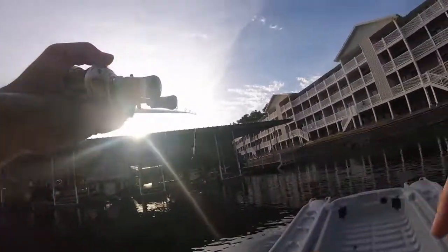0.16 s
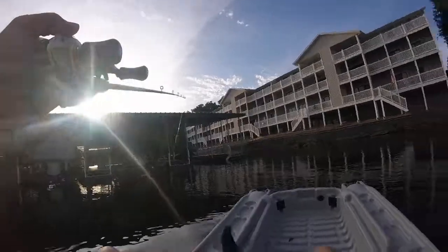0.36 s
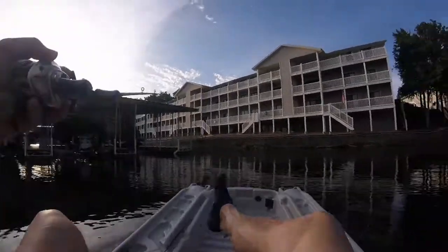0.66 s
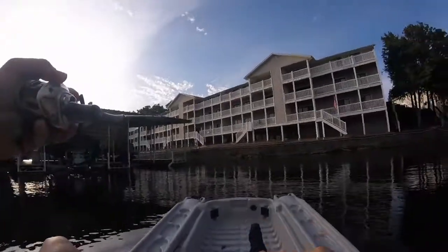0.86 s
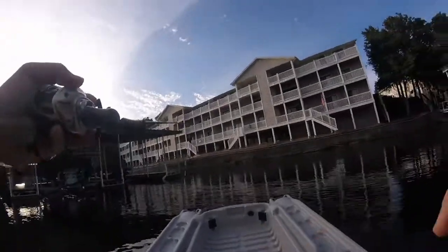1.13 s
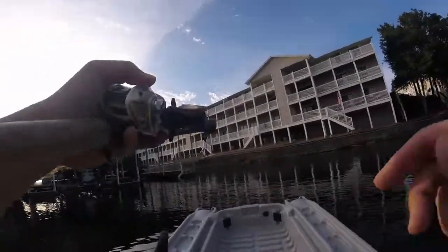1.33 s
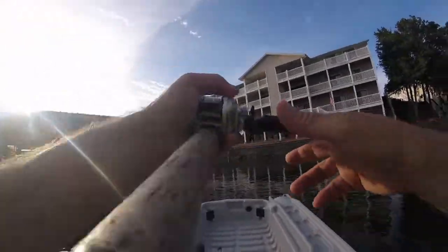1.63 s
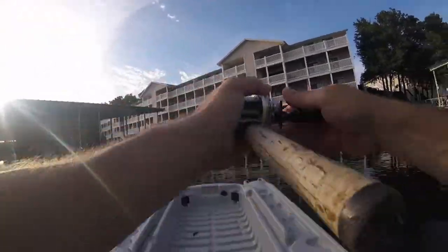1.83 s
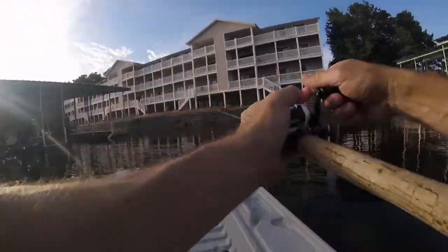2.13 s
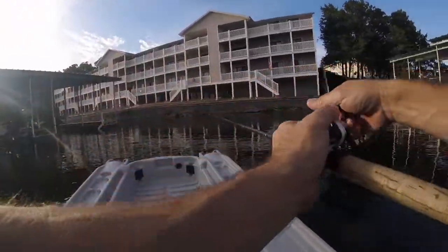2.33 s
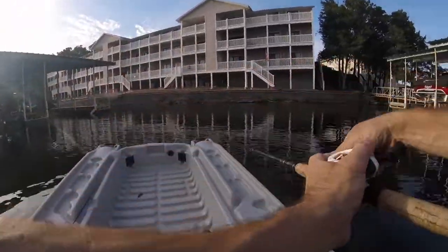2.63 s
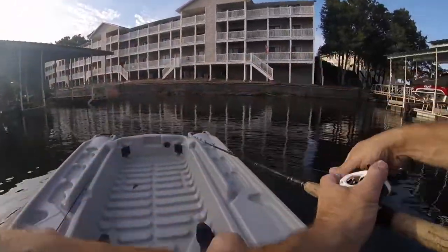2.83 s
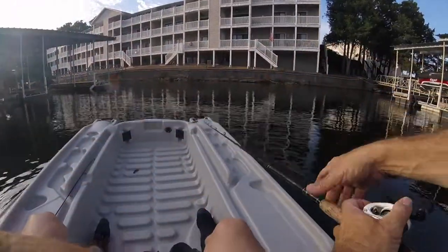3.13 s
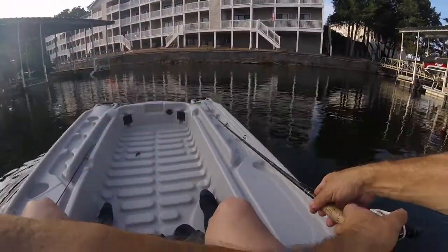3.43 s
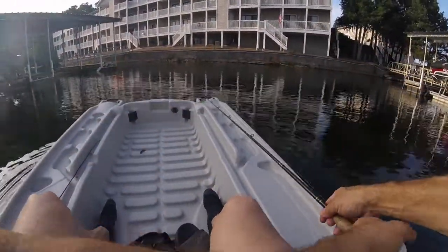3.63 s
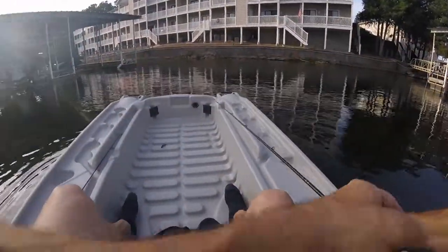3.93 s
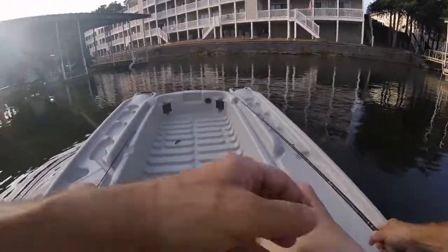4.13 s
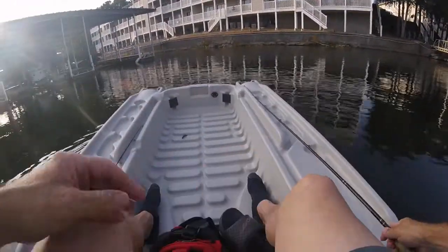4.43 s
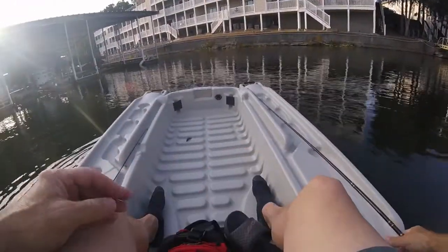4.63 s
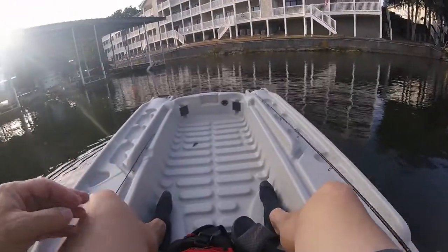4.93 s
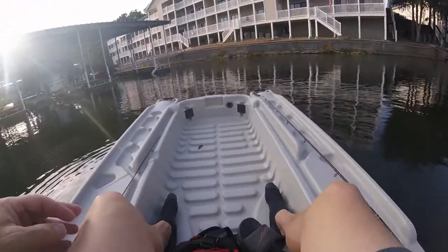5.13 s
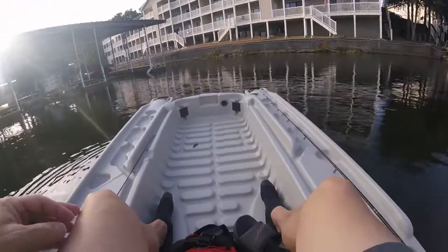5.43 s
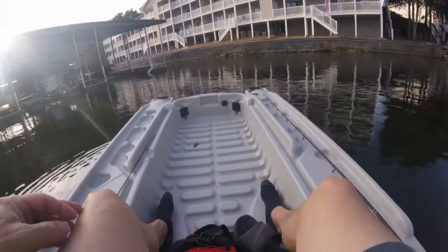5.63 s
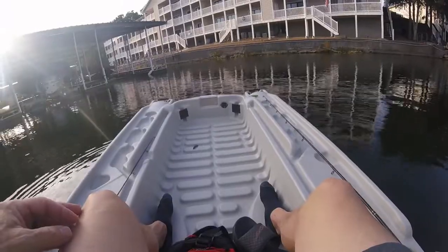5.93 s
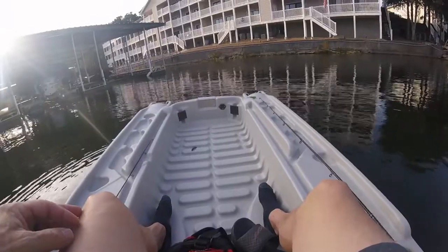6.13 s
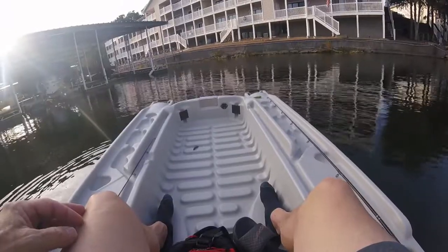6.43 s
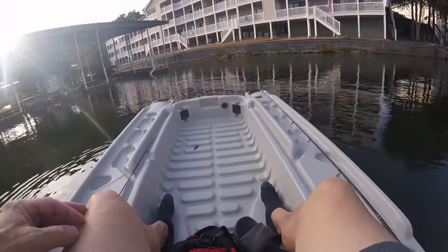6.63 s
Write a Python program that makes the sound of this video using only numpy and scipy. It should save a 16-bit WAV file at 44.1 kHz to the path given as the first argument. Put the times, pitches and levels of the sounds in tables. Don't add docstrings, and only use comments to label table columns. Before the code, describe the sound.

A microphone worn near the hands picks up crisp reel clicks, soft grip creaks and rubbing, then harder knocks as a fishing rod meets the plastic side of a small boat. It drops with a boomy thud and rattles still. Outdoors, quiet low rumble, faint airy hiss, a thin motor buzz and a slowly falling engine hum continue throughout.

```python
import sys
import numpy as np
from scipy import signal
from scipy.fft import rfft, irfft
from scipy.io import wavfile
from scipy.ndimage import uniform_filter1d

SR = 44100
rng = np.random.default_rng(int(sys.argv[2]) if len(sys.argv) > 2 else 0)


def persist_wave(psi):
    counts = np.round(np.clip(psi, -1, 1) * 32767).astype(np.int16)
    wavfile.write(sys.argv[1], SR, np.atleast_2d(counts).T)


def level_to_linear(level):
    exponent = np.asarray(level, float) / 20
    return 10 ** exponent


N = 298557

# f/Hz, bandwidth/Hz, level/dB
HULL_MODES = [(131, 22, 5), (157, 55, 13), (224.5, 7.9, -5.5), (362, 17.5, -7), (480, 30, -6),
              (614, 14.6, -3.5)]


def clock():
    return np.arange(N) / SR


def in_time(rows):
    s, *columns = np.transpose(rows)
    return [np.interp(clock(), s, c) for c in columns]


def rms_one(x):
    return x / np.sqrt(np.mean(x ** 2) + 1e-20)


def drift(rate_hz):
    r = np.exp(-2 * np.pi * rate_hz * 40 / SR)
    slow = signal.lfilter([1], [1, -2 * r, r * r], rng.standard_normal(N // 40 + 2002))[2000:]
    return np.interp(np.arange(N) / 40, np.arange(len(slow)), rms_one(slow))


def lowpass(x, order, hz):
    return signal.sosfilt(signal.butter(order, hz, fs=SR, output="sos"), x)


def bandpass(x, order, low_hz, high_hz):
    return signal.sosfilt(signal.butter(order, [low_hz, high_hz], "band", fs=SR, output="sos"), x)


def resonate(x, hz, width_hz):
    r = np.exp(-np.pi * max(width_hz, 5) / SR)
    poles = [1, -2 * r * np.cos(2 * np.pi * hz / SR), r * r]
    return signal.lfilter(np.array([1, 0, -1]) * (1 - r * r) / 2, poles, x)


def narrow_band(x, hz, width_hz):
    return rms_one(resonate(resonate(x, hz, width_hz), hz, width_hz))


def coloured(spectrum, patchy_db):
    white = rfft(rng.standard_normal(N))
    hz = np.arange(N // 2 + 1) * SR / N + 1e-3
    points_hz, points_db = np.transpose(spectrum)
    shaped = white * level_to_linear(np.interp(np.log(hz), np.log(points_hz), points_db))
    shaped = shaped / np.sqrt(np.mean(irfft(shaped, N) ** 2))
    out = 0
    for k in range(8, 30, 2):
        share = np.clip(1 - np.abs(2 * np.log2(hz) - k) / 2, 0, 1)
        out = out + irfft(shaped * share, N) * level_to_linear(patchy_db * drift(10.3))
    return out


def body(push, modes, widen, spread_db):
    draws = rng.standard_normal((min(len(modes), 5), 2))
    draws = np.resize(draws, (len(modes), 2))
    out = 0
    for k, ((hz, width_hz, db), (strength, detune)) in enumerate(zip(modes, draws)):
        gain = (-1) ** k * level_to_linear(db + spread_db * strength) * np.sqrt(1 / width_hz)
        out = out + gain * resonate(push, hz * (1 + detune / 60), width_hz * widen)
    return out / np.max(np.abs(out))


def rattle(t60, grain_db, size, rise_s=.0001):
    t = np.arange(size) / SR
    grains = rng.standard_normal(size) * level_to_linear(grain_db * np.minimum(rng.exponential(1, size), 3))
    fall_db = -60 * t / np.clip(t60, .003, .045)
    crack = 1 + np.exp(-t / .001)
    tail = level_to_linear(-26 + .25 * fall_db)
    return grains * (1 - np.exp(-t / rise_s)) * (crack * level_to_linear(fall_db) + tail)


def add(out, s, piece):
    i = max(round(s * SR), 0)
    out[i:i + len(piece)] += piece[:N - i]


def air():
    # t/s, level/dB
    swell = [(0.0, -37.5), (0.68, -37), (0.92, -39), (2.49, -39), (5.28, -37.5), (5.77, -41), (6.77, -38.5)]
    # f/Hz, density/dB
    rumble_spectrum = [(12, -27), (20, -16), (54, -4), (103, -2), (163, -5), (278, -11.5), (430, -16.5),
                       (1100, -33.5), (1430, -75)]
    # f/Hz, density/dB
    hiss_spectrum = [(530, -40), (900, -7), (1580, -3), (2440, -4.5), (4340, -9.5), (6560, -8.5),
                     (9370, -14.5), (10400, -18.5), (12300, -17), (14000, -29)]
    rumble_db, = in_time(swell)
    hiss_db = -59.5 - .5 * clock() + 0.9 * (rumble_db - rumble_db.mean())
    throbs = level_to_linear(-49) * narrow_band(rng.standard_normal(N), 61.5, 5)
    throbs += level_to_linear(-57) * narrow_band(rng.standard_normal(N), 121, 6)
    insects = level_to_linear(-71 + 1.5 * drift(1.5)) * narrow_band(rng.standard_normal(N), 6500, 330)
    rumble = level_to_linear(rumble_db - 6.5) * coloured(rumble_spectrum, patchy_db=1.16)
    hiss = level_to_linear(hiss_db + 0.6) * coloured(hiss_spectrum, patchy_db=1.64)
    return rumble + hiss + throbs + insects


def hums():
    # f/Hz, rms level/dB, start t/s, end t/s
    machines = [
        (105, -48.5, -.3, .9),
        (73.4, -53, 1.2, 4.1),
        (349.6, -63.5, 1.87, 5.9),
    ]
    out = np.zeros(N)
    for hz, db, a, b in machines:
        gate = np.interp(clock(), [a - .2, a + .1, b - .1, b + .2], [0, 1, 1, 0])
        level = np.sqrt(2) * level_to_linear(db + 2.0 * drift(2)) * gate
        turns = np.cumsum(hz * (1 + 0.00814 * drift(1.574))) / SR
        out += level * np.sin(2 * np.pi * turns)
    return out


def spray():
    # f/Hz, bandwidth/Hz, rms level/dB, start t/s, end t/s
    bands = [
        (2290, 310, -68, 0.34, 1.87),
        (4800, 960, -69, -.3, 1.9),
        (6490, 470, -66.5, 0.34, 1.8),
    ]
    out = np.zeros(N)
    for hz, width_hz, db, a, b in bands:
        gate = np.interp(clock(), [a - .3, a + .1, b - .2, b + .2], [0, 1, 1, 0])
        level = level_to_linear(db + 1.5 * drift(3)) * gate
        out += level * narrow_band(rng.standard_normal(N), hz, width_hz)
    return out


def motor():
    # f/Hz, bandwidth/Hz, rms level/dB, lag t/ms
    casing = [(2090, 25, -73, 0), (2620, 200, -72, 1), (2950, 300, -71.5, 1), (3620, 350, -70, .3),
              (4500, 400, -75, 1.2), (5080, 250, -74, 1.5), (5690, 230, -69.5, 1.6), (6390, 300, -79, 1)]
    # t/s, level/dB
    carry = [(0, -9), (.7, 1), (2.4, 3), (3.8, 3), (4.4, -1), (5.3, -2), (5.8, 2), (6.77, 1)]
    turn_hz = 58.09
    high_db, = in_time(carry)
    before = np.clip(2 * (2.6 - clock()), 0, 1)
    low_db = high_db - 3.5 - 7 * before
    mid_db = high_db - 12 * (1 - before)
    starts = np.arange(int(N / SR * turn_hz) - 1) / turn_hz
    strengths = level_to_linear(1.6 * rng.standard_normal(len(starts)))
    out = np.zeros(N)
    for hz, width_hz, db, lag_ms in casing:
        pulses = np.zeros(N)
        pulses[np.round((starts + lag_ms / 1000) * SR).astype(int)] = strengths
        pulses += level_to_linear(-9) * np.roll(pulses, round(SR / turn_hz / 2))
        carry_db = low_db if hz < 4000 else mid_db if hz < 5400 else high_db
        out += level_to_linear(db + 2 + carry_db + drift(2)) * narrow_band(pulses, hz, 1.04 * width_hz)
    return out


def engine():
    # t/s, f/Hz
    shaft = [(0, 29.75), (.6, 29.58), (1.2, 28.27), (2, 27.32), (2.6, 26.46), (4, 25.93), (4.6, 25.28),
             (6.1, 24.72)]
    orders = (5, 6, 8)
    orders_db = (-47.5, -46, -45)
    # t/s, depth/dB, half length t/s
    minima = [
        [(3.0, 20, 0.97), (5.5, 40, 0.48)],
        [(1.2, 8, 0.38), (4.5, 28, .4), (6.6, 13, 0.69)],
        [(0.197, 26.5, 2)],
    ]
    shaft_hz, = in_time(shaft)
    turns = np.cumsum(shaft_hz * (1 + 0.0018 * drift(2.4))) / SR
    out = np.zeros(N)
    for order, db, fades in zip(orders, orders_db, minima):
        level_db = db + drift(3.2)
        for s, depth_db, half_s in fades:
            level_db = level_db - depth_db * np.exp(-((clock() - s) / half_s) ** 2)
        out += np.sqrt(2) * level_to_linear(level_db) * np.sin(2 * np.pi * order * turns)
    return out


def load():
    # t/s, rise t/s, hold t/s, level/dB, decay/(dB/s)
    landings = [
        (0.416, 0.1, .01, -35, 122),
        (1.323, 0.031, .01, -38.5, 200),
        (4.303, 0.095, 0.12, -35, 498),
        (5.052, .006, .001, -9, 227),
        (5.098, 0.024, .01, -21, 100),
        (6.237, 0.0047, 0.11, -28.5, 430),
    ]
    t, envelopes = clock(), []
    for s, rise_s, hold_s, db, fall in landings:
        rise = np.clip((t - s) / rise_s, 0, 1) ** 2
        envelopes.append(rise * level_to_linear(db - fall * np.maximum(t - s - rise_s - hold_s, 0)))
    return np.max(envelopes, axis=0)


def boom():
    bumps = rng.standard_normal(N) * level_to_linear(3 * drift(40))
    bumps = lowpass(bumps, 2, 450)
    modes = [(50, 30, -23), (94, 14, -7)] + HULL_MODES[:3] + [(252, 29, 0.76)]
    low = sum(level_to_linear(db) * resonate(bumps, hz, 1.5 * width_hz) for hz, width_hz, db in modes)
    return level_to_linear(-4) * load() * rms_one(low)


def strokes():
    # t/s, length t/s, bright level/dB, dull level/dB
    slides = [(0.381, 0.097, -50, -41.5), (0.492, 0.07, -44, -45.5), (0.596, 0.095, -55, -56),
              (1.224, 0.23, -70, -59), (1.32, 0.1, -69, -47), (1.387, 0.27, -84, -58.5),
              (2.858, 0.19, -57, -50), (3.035, 0.097, -61, -61), (3.177, 0.36, -60, -55.5),
              (3.964, 0.12, -55, -46), (4.08, 0.23, -62, -56), (4.259, 0.17, -64, -42.5),
              (4.364, 0.17, -45, -44.5), (4.537, 0.15, -54, -57.5), (4.977, 0.056, -58, -40),
              (5.008, .06, -44, -47), (5.09, .09, -47, -45), (5.172, .12, -60, -46),
              (5.429, 0.028, -56, -39.5), (5.473, .1, -55.5, -49), (6.197, 0.37, -60, -62)]
    power, t = np.zeros((2, N)), clock()
    ends, peak_share, release_s = level_to_linear(-6), 0.34, 0.023
    for s, length, bright_db, dull_db in slides:
        corners = [-.006, 0, peak_share * length, length, length + release_s]
        shape = np.interp(t - s, corners, [0, ends, 1, ends, 0])
        power += (level_to_linear(np.array([[bright_db], [dull_db]])) * shape) ** 2
    return np.sqrt(power)


def rubbing():
    # f/Hz, density/dB
    rub_spectrum = [(590, -21), (1550, -2), (2030, -2), (4070, -8), (5330, -6), (6430, -11), (8000, -46),
                    (12000, -60)]
    bright, dull = strokes()
    clumps = level_to_linear(2.5 * drift(90))
    modes = HULL_MODES[3:] + [(750, 135, -13.0), (1190, 670, -20.5)]
    through_hull = sum(level_to_linear(db) * resonate(rng.standard_normal(N), hz, 3.1 * width_hz)
                       for hz, width_hz, db in modes)
    through_hull = lowpass(through_hull, 2, 1700)
    airborne = coloured(rub_spectrum, patchy_db=-2.5)
    return clumps * (level_to_linear(-0.5) * bright * airborne + level_to_linear(2.0) * dull * rms_one(through_hull))


def creaks():
    # f/Hz, bandwidth/Hz, level/dB
    blank = [(760, 55, -4), (1100, 70, -10), (1350, 120, -15), (1580, 70, 2), (2120, 83, -2),
             (2650, 99, -36)]
    jerks_per_s = 490
    strengths = level_to_linear(4.5 * np.minimum(rng.exponential(1, N), 3)) * rng.choice([-1, 1], N)
    jerks = (rng.random(N) < jerks_per_s / SR) * strengths
    rung = 0
    for hz, width_hz, db in blank:
        share = level_to_linear(4.5 * rng.standard_normal(N))
        rung = rung + level_to_linear(db) * resonate(jerks * share + 1e-18, hz, width_hz)
    return level_to_linear(-1) * strokes()[0] * rms_one(lowpass(rung, 3, 2800))


def snaps():
    # t/s, peak level/dB
    edges = [(0.3865, -50), (0.423, -35), (0.4958, -25), (0.587, -51.5), (0.6285, -45), (2.833, -52),
             (2.9297, -53), (3.2869, -67), (3.9355, -35), (4.0532, -68), (4.275, -43.5), (4.3071, -25),
             (4.3745, -58), (4.3984, -53), (4.4332, -31), (4.9821, -37), (5.0669, -46), (5.0948, -47),
             (5.3617, -46), (5.4321, -47), (6.304, -35)]
    out, t = np.zeros(N), np.arange(2000) / SR
    t60 = 0.015
    for s, db in edges:
        add(out, s, level_to_linear(db - 5.5 - 60 * t / t60) * rng.standard_normal(len(t)))
    return bandpass(out, 3, 8000, 12500)


def chatter():
    # t/s, length t/s, level/dB, centre f/Hz
    stretches = [(0.395, 0.065, -49, 2800), (0.398, 0.07, -46, 810), (0.496, 0.037, -52, 3200),
                 (0.502, 0.076, -50, 905), (1.233, .2, -55, 990), (1.908, 0.028, -57, 1200),
                 (1.934, 0.022, -45, 905), (1.976, 0.023, -51.5, 1390), (2.048, 0.021, -52.5, 1500),
                 (2.834, .2, -64, 1300), (2.976, .008, -47, 4470), (3.03, 0.17, -59, 1280),
                 (3.96, .1, -52.5, 1400), (4.072, 0.13, -55, 1290), (4.972, 0.01, -43.5, 2940),
                 (5.008, 0.021, -51.5, 4800), (5.083, 0.055, -59, 4160), (5.242, 0.039, -59, 2000),
                 (6.217, 0.057, -49, 684)]
    out, t = np.zeros(N), np.arange(6000) / SR
    span, fade_db = 1.7, 6
    for s, length, db, hz in stretches:
        grains = rng.standard_normal(len(t)) * level_to_linear(4.0 * np.minimum(rng.exponential(1, len(t)), 3))
        band = rms_one(bandpass(grains, 2, hz / span, hz * span))
        gate = np.interp(t, [0, .002, length, length + .01], [0, 1, 1, 0])
        add(out, s, band * level_to_linear(db - fade_db * t / length) * gate)
    return out


def rings():
    # t/s, f/Hz, peak level/dB, t60/s
    ringing = [(.058, 900, -46, 0.026), (.248, 1030, -48, 0.036), (.349, 890, -44, .04),
               (.364, 1150, -44, 0.027), (1.345, 790, -40.5, 0.23), (1.362, 42.3, -30, .25),
               (1.379, 1410, -38, 0.032), (1.98, 45.3, -38, .25), (2.783, 1460, -32.5, 0.042),
               (3.04, 1550, -47, 0.082), (3.068, 1190, -46, 0.1), (3.075, 1580, -42, .05),
               (3.134, 1550, -47, .04), (3.381, 1570, -54, .05), (3.43, 1520, -41, 0.046),
               (3.482, 1430, -45, 0.045), (3.7, 853, -54, 0.036), (3.936, 620, -27.5, 0.062),
               (3.996, 760, -35, .06), (4.016, 1580, -37, 0.097), (4.108, 1580, -39, .05),
               (4.148, 1540, -45, 0.069), (4.31, 3110, -29, 0.067), (4.314, 447, -23.5, 0.16),
               (4.403, 2500, -24, 0.023), (4.983, 2480, -22.5, 0.037), (4.993, 2400, -29, 0.045),
               (5.057, 490, -31, .12), (5.057, 774, -30, 0.035), (5.057, 1480, -26, .03),
               (5.088, 180, -23.5, 0.25), (5.122, 200, -14, 0.093), (5.147, 264, -23, .08),
               (5.176, 770, -31.5, 0.074), (5.229, 1390, -30, 0.028), (5.216, 630, -24, 0.044),
               (5.245, 1350, -36.5, 0.072), (6.395, 1590, -47.5, 0.047), (1.947, 910, -39, 0.022),
               (2.051, 1010, -40.5, .04), (3.85, 1580, -50.5, 0.06), (3.63, 1610, -53, 0.055),
               (.765, 2000, -46, 0.065), (6.757, 644, -39, 0.064)]
    # t/s, f/Hz, peak level/dB, t60/s
    more_ringing = [(0.406, 900, -31, 0.073), (.497, 820, -30, 0.068), (2.933, 3260, -20.5, 0.026),
                    (3.287, 1620, -24.5, 0.023), (3.935, 3120, -18, 0.022), (4.054, 4800, -31, .02),
                    (5.26, 780, -43, 0.1), (5.541, 307, -29.5, 0.075), (6.282, 304, -14.5, 0.015),
                    (6.304, 6220, -17.5, 0.014), (6.329, 418, -37.5, 0.18), (5.0555, 633, -10, 0.011),
                    (5.1225, 500, -19, .008), (3.937, 337, -34, 0.12), (5.438, 340, -32, 0.076)]
    out, t = np.zeros(N), np.arange(SR // 3) / SR
    for s, hz, db, t60 in ringing + more_ringing:
        onset = 1 - np.exp(-4 * hz * t)
        add(out, s, -level_to_linear(db - 60 * t / t60) * onset * np.sin(2 * np.pi * hz * t))
    return out


def knocks():
    # t/s, rod peak level/dB, hull level/dB, f/Hz
    taps = [(0.089, -32.5, -56, 470), (0.126, -31, -52, 467), (0.4, -23, -50, 1040), (0.459, -35, -44, 570),
            (0.498, -28, -33, 830), (1.384, -26, -76, 500), (1.909, -32, -32, 357), (1.945, -43, -33, 344),
            (1.98, -29.5, -33, 680), (2.051, -40, -34, 630), (2.275, -30.5, -58, 458),
            (2.862, -26, -26, 416.6), (2.9, -30.5, -35, 560), (3.069, -38, -47, 1570),
            (3.156, -30, -47, 1070), (3.222, -23.5, -48, 430), (3.288, -38, -22.5, 1620),
            (3.418, -27.5, -53, 1580), (3.432, -31, -64, 406.6), (3.489, -36.5, -52, 435),
            (3.592, -29.5, -33.5, 1155)]
    # t/s, rod peak level/dB
    slips = [(1.229, -44), (1.242, -37), (1.261, -42), (1.274, -28.5), (1.288, -30), (1.303, -28),
             (1.318, -36), (1.344, -47)]
    # t/s, rod peak level/dB, hull level/dB, f/Hz
    thumps = [(3.935, -16, -23, 1390), (3.98, -22, -53, 590), (4.276, -12, -20, 498),
              (4.309, -13.5, -27, 446), (4.329, -22, -26, 465), (4.362, -18, -34, 563),
              (4.44, -23.5, -19, 1060), (4.558, -29.5, -50, 665), (4.67, -32, -52, 600),
              (4.982, -10, -25, 574), (4.991, -15, -12.5, 583), (5.056, -11, -4.5, 371),
              (5.07, -34, -31, 351.4), (5.1215, -22, -12.5, 351), (5.146, -38, -23, 363),
              (5.175, -26, -27, 760), (5.215, -17.5, -38, 425), (5.248, -40, -24.5, 745),
              (5.437, -19.5, -48, 341), (5.514, -28, -24.5, 1570), (6.25, -37, -48, 430),
              (6.281, -21, -47, 460), (6.76, -33.5, -26, 386)]
    out = np.zeros(N)
    slips = [(s, db, -49, 990) for s, db in slips]
    for s, rod_db, hull_db, hz in [*taps, *slips, *thumps]:
        hard_db = 0.5 - 0.6 * max(hull_db + 45, 0)
        push = signal.lfilter([1], [1, -1.5, .5625], rattle(.008, grain_db=2.5, size=8000))
        modes = [(hz, hz / 8, 0), (hz * 1.33, hz / 6, -3), (hz * .72, hz / 5, -4)]
        modes += [(930, 530, hard_db - 2.0), (1570, 1300, hard_db - 13.5)]
        add(out, s, level_to_linear(rod_db - 3.0) * body(push, modes, widen=0.63, spread_db=4.5))
        add(out, s, level_to_linear(hull_db - 4.5) * body(push, HULL_MODES[:4], widen=2.13, spread_db=4.0))
    return out


def contacts():
    # f/Hz, bandwidth/Hz, level/dB
    reel_modes = [(2526, 810, -1), (3245, 260, -1.5), (3450, 170, -0.5), (4250, 1050, 7), (4820, 890, 1)]
    bright_modes = [(5780, 910, 0), (6470, 670, -11), (6325, 275, 3), (8270, 550, -11), (8170, 1040, -8)]
    rod_modes = [(680, 670, -10), (1040, 164, -6.5), (1390, 307, -3), (1620, 140, -1), (2053, 280, -4.5)]
    arm_modes = [(1010, 60, -1.5), (1910, 35, -8.5), (2700, 250, -7), (3110, 54, -7), (3570, 130, 3.5),
                 (3810, 330, 0.5), (4420, 300, -0.5), (4980, 250, -5), (5930, 120, -3.5), (6100, 180, -6.5),
                 (6500, 270, -4), (7300, 240, -10), (8140, 1100, -12.5)]
    # t/s, reel body peak level/dB, bright parts level/dB, rod level/dB
    swing = [(0.387, -23, -27, -32), (0.402, -20, -29, -27), (0.412, -27, -29, -38),
             (0.4234, -21.5, -33, -28), (0.459, -27.5, -46, -37), (0.4947, -15.5, -16, -23),
             (0.507, -14, -20.5, -34), (0.5181, -27, -19, -24.5), (0.5328, -23.5, -32, -45),
             (0.5536, -18.5, -32, -27), (0.5871, -16.5, -28.5, -24.5), (0.5993, -27, -34, -29.5),
             (0.6292, -25.5, -29.5, -36.5), (0.7622, -39, -44.5, -42), (0.8263, -32.5, -44, -41)]
    fingers = [(1.8816, -36, -58, -47.5), (1.934, -37, -43.5, -41), (2.782, -30, -32.5, -37),
               (2.8325, -29.5, -29, -34), (2.8617, -42, -50, -40), (2.9022, -20, -35, -32),
               (2.9329, -13, -19.5, -23.5), (2.9608, -31, -44, -34), (2.9952, -20, -35.5, -30.5),
               (3.1298, -32.5, -36, -60), (3.1515, -41, -41, -41), (3.2201, -51, -44, -28.5),
               (3.287, -15.5, -25, -28.5)]
    lay_down = [(3.9334, -20.5, -63, -15), (3.9776, -48, -49, -31.5), (3.9857, -41, -56, -31.5),
                (4.0147, -34, -52, -33), (4.054, -17.5, -31.5, -23), (4.2777, -30, -37, -27),
                (4.2985, -35, -49, -34), (4.3082, -17, -22.5, -20), (4.355, -30, -50, -39),
                (4.3734, -13.5, -19.5, -32), (4.3995, -16, -21, -17.5), (4.4247, -16, -30, -25),
                (4.5347, -36, -48, -46), (4.578, -36, -46, -57), (4.596, -35, -44, -48)]
    let_go = [(4.9819, -19, -39, -40), (4.9913, -22, -44, -27.5), (5.0067, -25, -28.5, -32),
              (5.037, -30, -32.5, -39), (5.0562, -26, -75, -33), (5.0689, -22, -26, -33),
              (5.0754, -20, -34, -55), (5.096, -15, -21.5, -47), (5.107, -36, -38, -41),
              (5.1354, -14, -28.5, -26), (5.1527, -23, -33, -37), (5.1661, -25, -47, -31),
              (5.1884, -35, -47, -37), (5.227, -20.5, -32.5, -31), (5.2433, -45, -63, -35.5),
              (5.2632, -46, -63, -41), (5.3621, -26, -29.5, -29.5), (5.4339, -14.5, -22.5, -28),
              (5.464, -31, -40, -58), (5.4919, -36.5, -60, -23), (5.539, -33.5, -53, -38.5),
              (6.0766, -47, -58, -64), (6.2193, -25.5, -35.5, -43), (6.258, -34, -46, -43),
              (6.3032, -20.5, -24, -27.5), (6.3226, -25, -33, -34.5), (6.4837, -34, -44.5, -47),
              (6.5854, -40, -54, -46.5), (6.754, -32, -39, -40)]
    # t/s, reel body peak level/dB
    bounces = [
        (4.434, -4),
        (4.4544, -10.5),
        (4.474, -9.5),
        (4.4887, -13),
        (4.4997, -18.5),
        (4.509, -24),
    ]
    bounces = [(s, db, db - 20, db - 32) for s, db in bounces]
    loose_s, firm_s = .00031, .0001
    # events, t60/s of a -15 dB contact, main modes, variety, rise t/s
    actions = [(swing, .042, reel_modes, 1, loose_s), (fingers, .027, reel_modes, 1, loose_s),
               (lay_down, .031, reel_modes, 1, firm_s), (bounces, .022, arm_modes, .3, firm_s),
               (let_go, .029, reel_modes, 1, firm_s)]
    out = np.zeros(N)
    for rows, t60, modes, varied, rise_s in actions:
        for s, reel_db, bright_db, rod_db in rows:
            contact_t60 = t60 - .00075 * (reel_db + 15)
            push = rattle(contact_t60, grain_db=4.5, size=5000, rise_s=rise_s)
            add(out, s, level_to_linear(reel_db - 5.0) * body(push, modes, widen=0.94, spread_db=2 * varied))
            add(out, s, level_to_linear(bright_db + 1.0) * body(push, bright_modes, widen=1.27, spread_db=3.33 * varied))
            add(out, s, level_to_linear(rod_db + 2.5) * body(push, rod_modes, widen=1.36, spread_db=5.5))
    return out


def scene():
    handling = boom() + rubbing() + rings() + knocks() + contacts()
    handling = lowpass(handling, 5, 8600)
    background = air() + hums() + spray() + motor() + engine()
    return (background + creaks() + snaps() + chatter() + handling)[None]


def thin_treble(x):
    sparse_from_hz, keep_above = 9400, 1.2
    hz, s, lines = signal.stft(x, SR, nperseg=2048)
    local = np.sqrt(uniform_filter1d(np.abs(lines) ** 2, size=48, axis=0))
    wander = drift(2.5) + 4 * (clock() < .4) + 2 * (clock() > 5.6)
    edge_hz = 13000 + 400 * np.interp(s, clock(), wander)
    treble = local[hz > sparse_from_hz].mean(axis=0)
    calm = treble < 2 * np.median(treble)
    weak = (np.abs(lines) < keep_above * local) & (hz[:, None] > sparse_from_hz)
    lost = calm & (weak | (hz[:, None] > edge_hz))
    return signal.istft(lines * ~lost, SR, nperseg=2048)[1][:N]


def low_pass(x):
    return signal.sosfilt(signal.butter(12, 14300, fs=SR, output="sos"), x)


def record(dry):
    # f/Hz, bandwidth/Hz, boost/dB
    port = (6500, 500, 3)
    hz, width_hz, boost_db = port
    mix = dry[0] + (level_to_linear(boost_db) - 1) * resonate(dry[0], hz, width_hz)
    return low_pass(thin_treble(mix)[None])


dry = scene()
out = record(dry)
persist_wave(out)
```